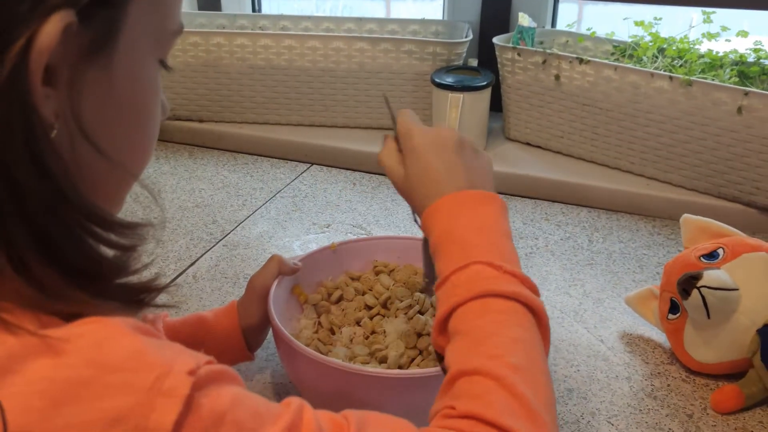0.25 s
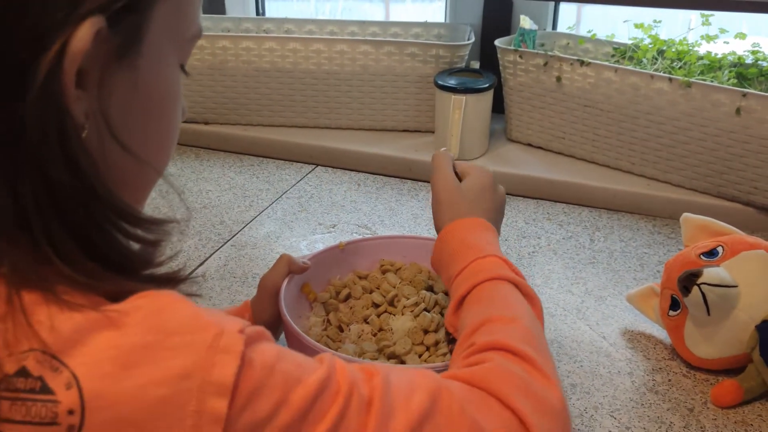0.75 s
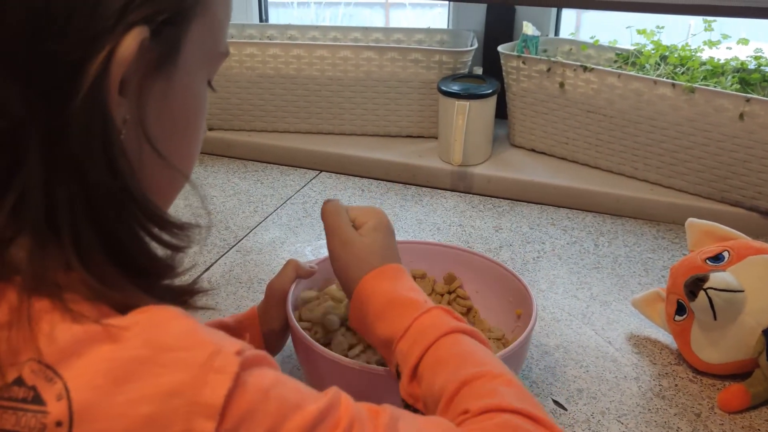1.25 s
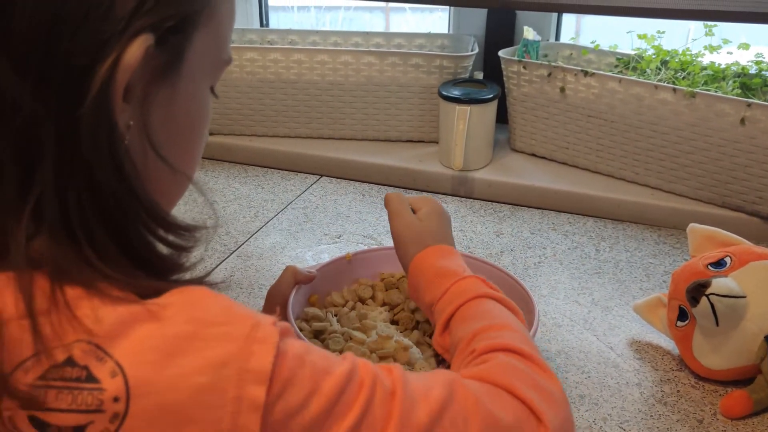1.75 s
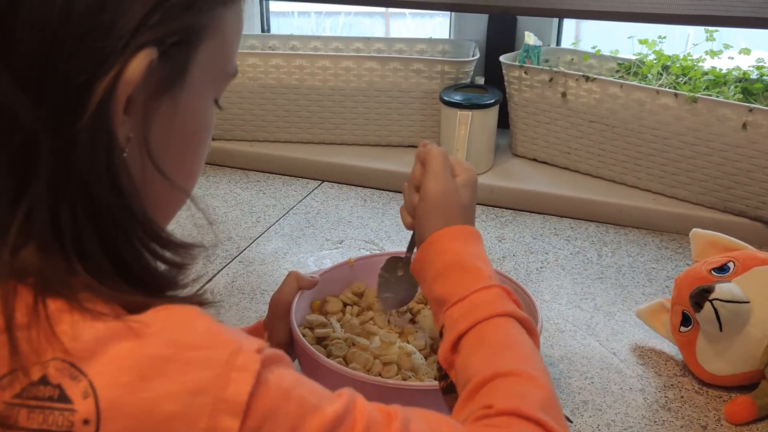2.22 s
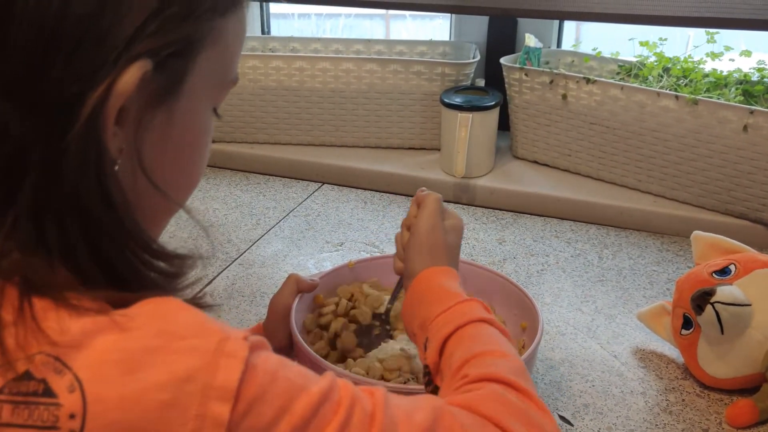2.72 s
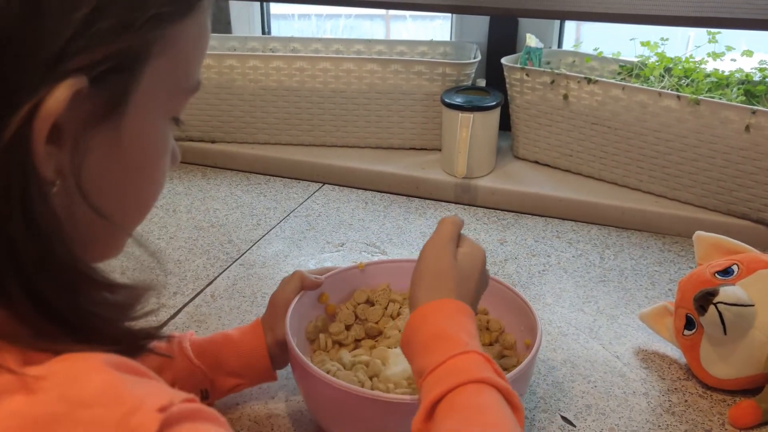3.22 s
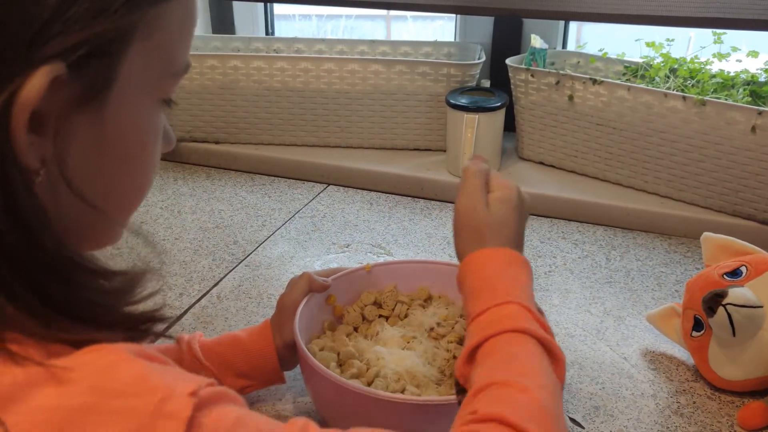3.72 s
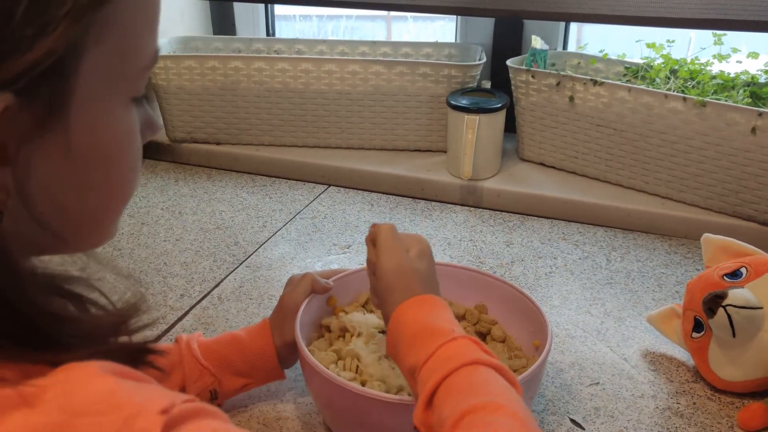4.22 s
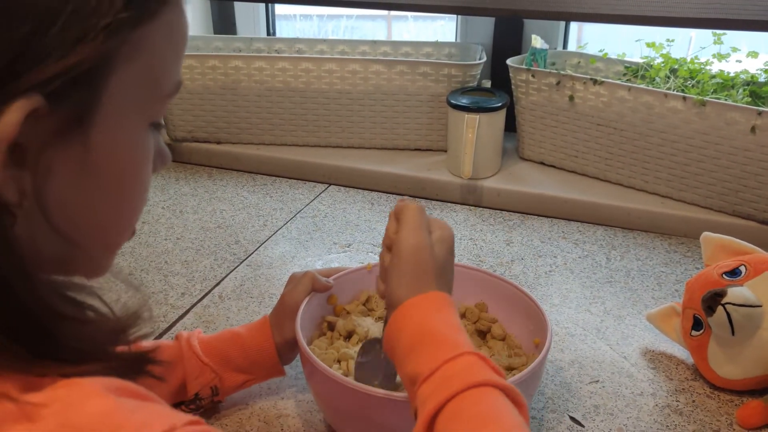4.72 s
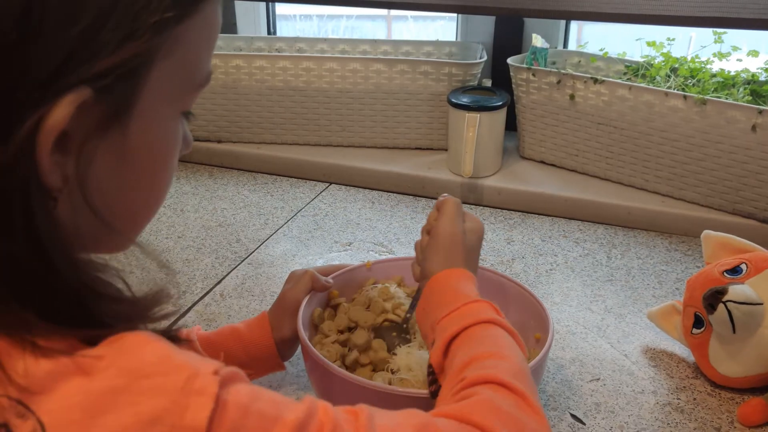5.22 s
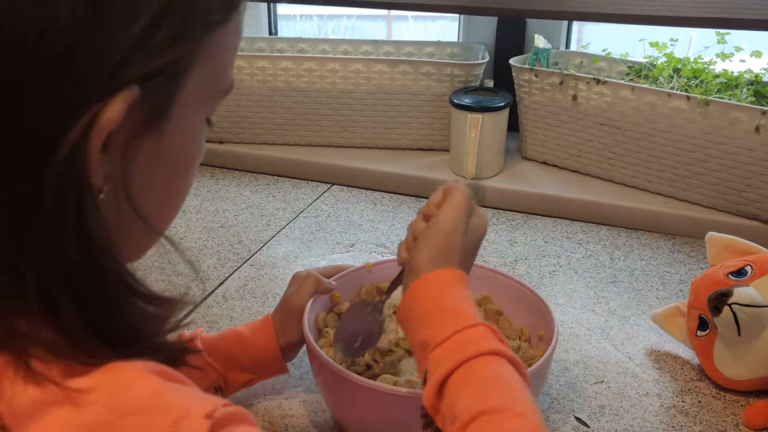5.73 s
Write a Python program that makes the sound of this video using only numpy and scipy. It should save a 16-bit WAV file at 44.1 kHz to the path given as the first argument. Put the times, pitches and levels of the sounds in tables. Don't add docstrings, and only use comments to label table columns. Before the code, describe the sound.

A spoon stirs dry crunchy cubes in a plastic bowl on a kitchen table. Faint crumbly jabs come first, then dense clattering and rustling, a dull bowl knock, and longer drags that thin out. After a short lull come a sharp jab, sparser strokes and faint metallic ticks, then a hard bright knock at the end. Close stereo microphone, small room, quiet low fridge hum.

```python
import sys
import numpy as np
from scipy import signal
from scipy.fft import rfft, irfft, next_fast_len
from scipy.io import wavfile

SR = 44100
rng = np.random.default_rng(int(sys.argv[2]) if len(sys.argv) > 2 else 0)


def bounce(signal):
    frames = np.transpose(np.atleast_2d(signal))
    limited = np.clip(frames, -1, 1)
    pcm = np.round(limited * 32767).astype(np.int16)
    wavfile.write(sys.argv[1], SR, pcm)


def magnitude_from_level(level_db):
    exponent = np.asarray(level_db, float) / 20
    return 10 ** exponent


N = 262904


def rms_one(x):
    return x / np.sqrt(np.mean(x ** 2) + 1e-20)


def at_hz(points, hz):
    curve_hz, value = np.array(points)[:, 0], np.array(points)[:, 1]
    return np.interp(np.log(hz), np.log(np.maximum(curve_hz, 1)), value)


def butter(x, order, hz, kind):
    return signal.sosfilt(signal.butter(order, hz, kind, fs=SR, output="sos"), x)


def drift(rate_hz):
    r = np.exp(-80 * np.pi * rate_hz / SR)
    noise = rng.standard_normal(N // 40 + 2002)
    slow = signal.lfilter([1], [1, -2 * r, r * r], noise)[2000:]
    return np.interp(np.arange(N) / 40, np.arange(len(slow)), rms_one(slow))


def resonance(x, hz, width_hz):
    r = np.exp(-np.pi * width_hz / SR)
    poles = [1, -2 * r * np.cos(2 * np.pi * hz / SR), r * r]
    return signal.lfilter((1 - r * r) / 2 * np.array([1, 0, -1]), poles, x)


def stereo(mid, side, alike, lean_db=0):
    alike = np.clip(alike, -1, 1)
    opposed = np.sqrt(1 - alike) * side * np.array([[1], [-1]])
    pair = np.sqrt(1 + alike) * mid + opposed
    return pair * magnitude_from_level([[lean_db / 2], [-lean_db / 2]]) / np.sqrt(2)


def struck(at_s, blows, modes):
    out, at = np.zeros(N), (np.array(at_s) * SR).astype(int)
    strength_db = rng.normal(0, 1.5, (len(at), len(modes)))
    for k, (hz, level_db, t60_s) in enumerate(modes):
        clicks = np.full(N, 1e-18)
        clicks[at] = blows[:, k] * magnitude_from_level(level_db + strength_db[:, k])
        r, w = magnitude_from_level(-60 / (t60_s * SR)), 2 * np.pi * hz / SR
        out += signal.lfilter([0, np.sin(w)], [1, -2 * r * np.cos(w), r * r], clicks)
    return out


# hz, level_db (per Hz)
CONTACT_COLOUR = [(290, -57), (500, -28), (707, -18), (878, -24.5), (1210, -18.5), (1350, -23.5),
                  (2060, -2), (2520, 2), (3890, -10), (4760, -6), (7900, -15.5), (10400, -37.5),
                  (12000, -21.5), (14100, -20.5), (15800, -26)]
PART_EDGES_HZ = [1600, 3700, 7400]
# wall_db, cubes_db, crusts_db, crumbs_db
PART_TRIM_DB = [-4, -1, -2.5, 2]
# hz, part_number
PART_BLEND = [(1300, 0), (1900, 1), (3200, 1), (4300, 2), (7000, 2), (9000, 3)]
# hz, likeness (0..1)
TABLE_LIKENESS = [(60, 0.56), (130, 0.94), (290, 0.55), (640, 0.017), (1410, 0.11), (3100, 0.44),
                  (6820, 0.023), (15000, 0.045)]
# hz, lean_db
TABLE_LEAN = [(60, 1.5), (130, 1.0), (290, -19), (640, -2), (1410, 4.5), (3100, -1.5), (6820, 1.5),
              (15000, -7)]


def bread():
    (at, size), (tap_at, tap_size) = stirred_contacts(), tap_contacts()
    at, size = np.concatenate([at, tap_at]), np.concatenate([size, tap_size], axis=1)
    edges_hz = 480 * 2 ** np.arange(0, 5.1, .18)
    centre_hz = np.sqrt(edges_hz[1:] * edges_hz[:-1])
    part, gain = np.searchsorted(PART_EDGES_HZ, centre_hz), magnitude_from_level(at_hz(CONTACT_COLOUR, centre_hz))
    power = np.bincount(part, gain ** 2 * np.diff(edges_hz) * 2 / SR)
    log_size = np.log(size * (magnitude_from_level(PART_TRIM_DB) / np.sqrt(power))[:, None] + 1e-12)
    taps = slice(-len(tap_at), None)
    out = np.zeros((2, N))
    for k, hz in enumerate(centre_hz):
        blend = np.maximum(1 - np.abs(at_hz(PART_BLEND, hz) - np.arange(4)), 0)
        colour = np.random.default_rng(rng.integers(2 ** 30)).standard_normal((2, len(at)))
        colour *= magnitude_from_level(np.minimum(rng.normal(0, 3.25, len(at)), 6) - 2.0)
        colour[:, taps] = np.sign(colour[:, taps]) * np.abs(colour[:, taps]) ** 0.12
        colour[1, taps] *= .5
        force = np.exp(blend @ log_size)
        mid, side = [np.bincount(at, force * c, N) + 1e-18 for c in colour]
        pair = stereo(mid, side, at_hz(TABLE_LIKENESS, hz), at_hz(TABLE_LEAN, hz))
        out += butter(pair, 2, edges_hz[k:k + 2], "band") * gain[k]
    return out


CONTACTS_PER_S, CLUMP_DB, FLURRY_DB = 3000, 2.5, 2.5
# wall_db, cubes_db, crusts_db, crumbs_db
PART_UNEVEN_DB = [3.7, 1.2, 1.5, 0.23]


def stirred_contacts():
    rate_per_s = CONTACTS_PER_S * magnitude_from_level(CLUMP_DB * drift(25) + FLURRY_DB * drift(90))
    at = np.flatnonzero(rng.random(N) < rate_per_s / SR)
    size = magnitude_from_level(np.outer(PART_UNEVEN_DB, np.minimum(rng.exponential(1, N), 4)[at]))
    size = size * np.sqrt(N / np.sum(size ** 2, axis=1, keepdims=True))
    return at, size * stroke_levels(at / SR)


SWING_DB, FADE_BEND = 20, 1.4
JAB_SWELL_S, JAB_WALL_DB, DRAG_WALL_DB = .005, -14.5, -16.5
DRAG_CRUSTS_DB, CRUSTS_FOLLOW = 5, 0.6
# start_s, cubes_db, fade_s, crusts_db (re cubes), crumbs_db (re cubes)
JABS = [(.002, -85, 0.077, 7, 4), (.34, -86.5, 0.12, 12, 11), (0.174, -75.5, 0.14, 15, 11),
        (0.501, -79, 0.083, 17, 14.5), (0.682, -63, 0.11, 12.5, 0), (0.901, -46.5, 0.22, 1, -5.5),
        (1.108, -52.5, 1, 0, -5.5), (1.289, -39, 0.096, -7, -12), (1.683, -46.5, 0.035, -8, -32),
        (1.723, -45.5, 0.085, -3, -23), (2.013, -54.5, 0.079, -1, -20), (2.186, -65, 0.051, 4, -1),
        (2.278, -68, 0.093, -0.5, 4), (2.433, -64.5, 0.22, 15.5, 8.5), (2.922, -45, 0.092, -1, -19),
        (3.452, -53, 0.31, -1.5, -31), (3.92, -41.5, 0.11, 1, -10.5), (4.85, -48.5, 0.14, -3.5, -8.5),
        (5.927, -55, 0.15, -6, -13)]
# peak_s, cubes_db, swell_s, fade_s, crumbs_db (re cubes)
DRAGS = [(.215, -73.5, 0.045, 0.078, 6.5), (0.842, -44.5, 0.052, 0.15, -6),
         (1.358, -42, 0.041, 0.18, -10.5), (1.55, -62, 0.36, 0.18, 4.5), (1.768, -40, 0.061, .15, -11),
         (1.87, -53, 0.36, 0.25, -8), (2.12, -67, .2, 0.3, -9), (2.473, -42, .03, 0.094, -13.5),
         (2.604, -47.5, 0.12, 0.47, -8.5), (2.88, -56.5, 0.21, 0.61, -0.5), (3.27, -46, 0.37, 0.14, -16.5),
         (3.52, -48.5, 0.093, 0.12, -21), (3.62, -61.5, 0.5, 0.052, -2), (3.7, -62.5, 0.1, 0.049, -12),
         (4.229, -58.5, 0.31, 0.26, -7.5), (4.285, -48, 0.082, 0.052, -9.5), (4.413, -48, 0.15, 0.13, -12),
         (4.58, -67.5, 0.29, 0.12, -7), (4.932, -57.5, 0.043, 0.053, -0.5), (5.168, -51, 0.052, 0.2, -6.5),
         (5.12, -64.5, 0.28, .1, -6), (5.42, -58, 0.21, 0.2, -34), (5.495, -49.5, 0.16, 0.1, -13),
         (5.62, -81.5, 0.16, 0.17, 10.5)]
# peak_s, level_db, swell_and_fade_s
SCRAPES = [
    (.9, -60.5, 0.47),
    (1.3, -61, 0.28),
    (2.66, -57, 0.31),
    (3.27, -52, 0.13),
    (4.28, -59.5, 0.2),
    (4.42, -55, 0.086),
    (5.18, -62, 0.15),
    (5.42, -64, 0.48),
]


def stroke_levels(t):
    jabs = [(s, db, JAB_SWELL_S, fade, JAB_WALL_DB, crusts, crumbs) for s, db, fade, crusts, crumbs in JABS]
    drags = [(s, db, swell, fade, DRAG_WALL_DB, DRAG_CRUSTS_DB + CRUSTS_FOLLOW * crumbs, crumbs)
             for s, db, swell, fade, crumbs in DRAGS]
    s, db, swell, fade, wall, crusts, crumbs = np.transpose(jabs + drags)[:, :, None]
    rise, fall = (s - t) / swell, (np.maximum(t - s, 0) / fade) ** FADE_BEND
    below_db = SWING_DB * np.maximum(rise, fall)
    power = [np.sum(magnitude_from_level(db + part - below_db) ** 2, axis=0) for part in (wall, 0, crusts, crumbs)]
    s, db, length = np.transpose(SCRAPES)[:, :, None]
    power[0] = power[0] + np.sum(magnitude_from_level(db - SWING_DB * np.abs((t - s) / length)) ** 2, axis=0)
    return np.sqrt(power)


BOUNCE_S, BOUNCE_DB = .003, -8
# wall_db, cubes_db, crusts_db, crumbs_db
TAP_TRIM_DB = [-19, -3.5, -2.5, -5]
# start_s, cubes_db (energy), crusts_db (re cubes), crumbs_db (re cubes), pitch_hz
CUBE_TAPS = [(0.1713, -67, 23, 6, 3600), (0.1772, -58, 13, 11, 3620), (0.2065, -54, 20, 5, 1850),
             (0.5012, -55.5, 17, 10, 2210), (0.5126, -56.5, 26, 23, 3570), (0.5171, -66, 23, 32, 3590),
             (0.684, -31, -4, -16, 2700), (0.6951, -34, 16, -3, 3500), (0.7511, -48, 21.5, -10, 3590),
             (0.76, -49, 17, -10, 3600), (0.7924, -46.5, 23, 1, 2750), (0.8171, -33, 9, -13, 2590),
             (0.8452, -16, -10, -8, 2110), (0.8573, -31, 16, 2, 2100), (0.8777, -34, 4, -5, 2650),
             (0.9026, -20.5, 2, -12, 2190), (0.931, -21, 5.5, -6, 2270), (0.952, -41, 1, -7, 2750),
             (1.0044, -38, 8, 8, 2700), (1.0124, -22, -4, -7, 2300), (1.0516, -27.5, 4, -19, 2310),
             (1.074, -28, -1, -13, 2710), (1.1094, -19, 8, -7, 2370), (1.1228, -21.5, -2, -20, 2200),
             (1.1337, -20.5, -0.5, -12, 2640), (1.187, -31, 0, -15, 2180), (1.1949, -25, 6, -8, 2280),
             (1.2291, -29, -14, -16, 2400), (1.2609, -32, -2, -12, 2750), (1.2895, -13.5, -8, -22, 2535),
             (1.2954, -21, -9, -15, 2650), (1.308, -22, -13, -18, 2470), (1.3135, -17.5, -2, -20, 2440),
             (1.3187, -23, -7, -17, 2600), (1.3518, -29, -2, -13, 2700), (1.3579, -17.5, -3, -5, 2400),
             (1.3645, -16, -7, -20, 2580), (1.369, -12.5, -5, -16, 2220), (1.3759, -21, 10, -16, 2570),
             (1.3978, -17, -10, -4, 2900), (1.4123, -19.5, 1.5, -23, 2350), (1.4167, -22, -7, -19, 2570),
               (1.4355, -38, 7, -3, 2750), (1.4647, -23.5, 2, 6, 2470), (1.4754, -22, -14, -19, 2320),
               (1.558, -48, 16, 2, 2010), (1.5643, -41, 14, -5, 1970), (1.6046, -46, 23, 5, 2570),
               (1.6121, -49, 17, -1, 2550), (1.6808, -18, 5, -18, 2660), (1.688, -30, -3, -31.5, 2830),
               (1.726, -25.5, 4, -13, 3640), (1.7427, -20, -14, -22, 2530), (1.7484, -22, 1, -8, 2070),
               (1.7575, -27.5, 13.5, -11, 2120), (1.7655, -13, -6, -27, 2040), (1.7761, -19, -6, -19, 2050),
               (1.7885, -27, 10, -14, 2000), (1.7956, -13, 7, -28.5, 2100), (1.8008, -19, 1, -21, 2390),
               (1.8117, -22, 3, -4, 2420), (1.8575, -32.5, 20, 12, 2730), (1.872, -32, 15, 9, 2010),
               (1.8808, -28.5, 14, 12, 2530), (1.9266, -42, 12, -15, 2160), (1.979, -39, 14, -9, 2300),
               (2.0214, -28.5, -9, -27, 2440), (2.0255, -36, -6, -10, 2860), (2.094, -40.5, 9, -16, 2820),
               (2.185, -31, 0, -21, 2810), (2.1941, -34.5, -1, 2, 3230), (2.2881, -43, 0, -6, 2630),
               (2.369, -58.5, 24, 3, 2330), (2.426, -58, 30, 9, 3120), (2.4421, -42, 23.5, 0, 2480),
               (2.4677, -20.5, 2.5, -9, 2300), (2.5035, -20.5, -9, -17, 2940), (2.5555, -34, 0, -13, 2430),
             (2.5942, -28, -10, -10, 2250), (2.6268, -26, -7, -14, 2250), (2.654, -34, 12, -1, 2050),
              (2.6734, -34, 15.5, 1, 2730), (2.7205, -33, 1, -7, 2630), (2.7424, -22.5, -9, -15, 2410),
              (2.7695, -33, 3, -14, 2410), (2.7765, -40, 3, -7, 2340), (2.7892, -34, 8, -10, 2740),
              (2.8056, -31, 5, -11, 2430), (2.8298, -34, 7, -12, 2720), (2.853, -42, 14, 0, 2270),
              (2.8611, -41, 21, -1, 2670), (2.883, -37, 10, -2, 3600), (2.8957, -34, 5, -4, 2000),
              (2.9236, -17, -5, -25, 2650), (2.9532, -30, 1, -6, 1970), (2.96, -30, 8.5, -10, 3040),
              (2.967, -33, 8, -5, 2730), (2.986, -38, 5, -4, 2940), (2.9958, -34, 12, -6, 2590),
              (3.0416, -37, 6, 2, 2400), (3.0936, -23.5, 4, -6, 2680), (3.118, -32, 6, -13, 2800),
              (3.141, -38, 8.5, -17, 2660), (3.168, -39, 13, -5, 2590), (3.1806, -21.5, 4, -22, 3660),
              (3.245, -32, 16, -14, 2960), (3.251, -27, 10, -19, 2350), (3.32, -29, 7, -22, 2410),
              (3.3598, -28, -9, -23, 2920), (3.422, -36, -1, -39, 2700), (3.4778, -24, -5, -23, 2290),
              (3.503, -21.5, 4, -28, 2410), (3.523, -27, -10, -29, 2170), (3.5276, -28, -9, -18, 2520),
              (3.5554, -28, -8, -23, 2430), (3.5931, -26.5, 2, -16, 2390), (3.6892, -34, 4, -23, 2300),
             (3.9098, -38, 12, 0, 1970), (3.916, -25, 6, -15, 3500), (3.9234, -13.5, 3.5, -18, 2570),
               (3.9319, -19, 6, -19, 2110), (3.9373, -16.5, 5, -14, 2060), (3.9502, -23, 4, -13, 2310),
               (3.9713, -37, 0, -16, 2190), (4.0473, -40, 10, -15, 3200), (4.1101, -54, 15, -1, 2310),
               (4.118, -41.5, 12, -12, 2380), (4.1402, -44.5, 11, -15, 2190), (4.2068, -38, -1, -26, 2630),
               (4.2134, -35, -13, -17, 2590), (4.267, -30, 4, 1, 2140), (4.2845, -25, 1, -21, 2120),
               (4.2981, -33, 1, -16, 2330), (4.3842, -29.5, -6, -14, 2080), (4.4076, -25, -1, -14, 1930),
               (4.426, -31.5, 10, -11, 2730), (4.5563, -33.5, -1.5, -24, 2640), (4.6667, -55, 12, -1, 3040),
               (4.6933, -47, 5, -11, 2120), (4.8562, -28, -8, -17, 2005), (4.8755, -39, 14, 12, 2100),
               (5.1604, -42, 9, -1, 2550), (5.1673, -26, -0.5, -17, 2510), (5.172, -20.5, -7, -18, 2240),
               (5.1793, -30, 7, -7, 2170), (5.2247, -27.5, -1, -17, 1990), (5.2307, -27, -10, -16, 2070),
               (5.402, -36, -14, -24, 2590), (5.4595, -25, 3, -7, 2300), (5.4854, -29, -1, -21, 2620),
               (5.4997, -29, -9, -20, 2520), (5.5083, -32, -12, -25, 2450), (5.566, -41, 12, -4, 3140),
               (5.599, -56, 25, 9, 2890), (5.608, -53.5, 25, 19, 2840), (5.9324, -21, -9, -15, 2920),
             (5.658, -54.5, 9, 0, 2000),
    (5.675, -51, 8, 4, 2710),
    (5.9306, -29, -4, -20, 2400),
    (5.9543, -11, 7, 5, 1100),
    (3.9, -41, -6, -20, 3600),
    (2.618, -50, 8, 15, 2400),
]
TAPS = CUBE_TAPS


def tap_contacts(count=3):
    s, cubes, crusts, crumbs, _ = np.transpose(TAPS)[:, :, None]
    late = rng.exponential(1, (len(TAPS), count)) * (np.arange(count) > 0)
    fade_db = (BOUNCE_DB - late) * (late > 0)
    at = np.minimum((s + late * BOUNCE_S) * SR, N - 1).astype(int)
    levels_db = [cubes + part + trim + fade_db for part, trim in zip((0, 0, crusts, crumbs), TAP_TRIM_DB)]
    return at.ravel(), magnitude_from_level(levels_db).reshape(4, -1)


RING_ATTACK_S, RING_DB, RING_T60_S = 0.00047, -18.5, 0.028


def cube_rings():
    out, t = np.zeros((2, N + 2000)), np.arange(2000) / SR
    lean_db = rng.normal(0.84, 3.0, len(TAPS))
    for (start_s, cubes_db, _, _, pitch_hz), lean in zip(TAPS, lean_db):
        shape = np.minimum(t / RING_ATTACK_S, 1) * magnitude_from_level(cubes_db + RING_DB - 60 * t / RING_T60_S)
        ring = shape * np.sin(2 * np.pi * pitch_hz * t)
        at = int(start_s * SR)
        out[:, at:at + 2000] += ring * magnitude_from_level([[lean], [-lean]])
    return out[:, :N]


# start_s, blow_db, stem_db (re blow)
TICKS = [
    (.513, -54, -40),
    (4.876, -62, -40),
    (4.91, -63, -40),
    (5.632, -78, 8),
    (5.677, -73, 4),
]
# hz, level_db, t60_s
SPOON_MODES = [(6860, 7.5, 0.065), (13300, 10.5, .045), (13750, -21, .04), (14900, 2, .025)]


def spoon():
    start_s, blow_db, stem_db = np.transpose(TICKS)
    stem = np.arange(len(SPOON_MODES)) == 0
    blows = magnitude_from_level(blow_db[:, None] + np.outer(stem_db, stem))
    return struck(start_s, blows, SPOON_MODES) * magnitude_from_level([[-3.0], [3.0]])


# start_s, blow_db, bright_hz
KNOCKS = [
    (1.681, -48, 1500),
    (3.924, -59, 2015),
    (5.954, -23.5, 8700),
    (5.9558, -19, 800),
]
# hz, level_db, t60_s
BOWL_MODES = [(446, -32, 0.037), (700, -9.5, 0.068), (820, -17.5, 0.08), (1154, -19, 0.034),
              (5780, -15, 0.0096), (2060, 6.5, 0.015), (2940, 4.5, 0.035), (5100, 0.5, 0.053)]


def bowl():
    start_s, blow_db, bright_hz = np.transpose(KNOCKS)[:, :, None]
    blows = magnitude_from_level(blow_db) / (1 + (np.array(BOWL_MODES)[:, 0] / bright_hz) ** 2)
    left = magnitude_from_level(0.5) * struck(start_s[:, 0], blows, BOWL_MODES)
    right = struck(start_s[:, 0] + 0.00012, blows, BOWL_MODES)
    return butter([left, right], 2, 350, "high")


CRACK_T60_S, CRACK_LOW_HZ = 0.0088, 440
# start_s, peak_db
CRACKS = [
    (1.6806, -40),
    (5.9538, -36.5),
]


def cracks():
    out, t = np.zeros((2, N + 400)), np.arange(400) / SR
    bursts = rng.standard_normal((len(CRACKS), 400)) * magnitude_from_level(-60 * t / CRACK_T60_S)
    for (start_s, peak_db), burst in zip(CRACKS, bursts):
        at = int(start_s * SR)
        out[:, at:at + 400] += magnitude_from_level(peak_db) * burst
    return butter(out[:, :N] + 1e-18, 4, CRACK_LOW_HZ, "high")


# start_s, end_s, start_hz, end_hz, level_db
SLIDE = (3.62, 3.9, 5900, 5500, -73)


def slide():
    start_s, end_s, start_hz, end_hz, level_db = SLIDE
    along = np.clip((np.arange(N) / SR - start_s) / (end_s - start_s), 0, 1)
    rough = rms_one(signal.lfilter([1], [1, -.93], rng.standard_normal((2, N))))
    phase = 2 * np.pi * np.cumsum(start_hz + (end_hz - start_hz) * along) / SR
    return magnitude_from_level(level_db) * np.sin(np.pi * along) ** .5 * rough * np.sin(phase)


# start_s, peak_db, pitch_hz
THUMPS = [(1.347, -68, 77), (1.617, -62, 70.3), (1.899, -74, 61.9), (2.551, -65.5, 77.5),
          (2.699, -71, 73.6), (2.949, -68, 62), (3.071, -67, 75), (3.219, -67, 82), (3.578, -70, 99),
          (4.948, -67, 65), (5.298, -73, 99.6)]


def table_top():
    out, t = np.zeros(N), np.arange(N) / SR
    for start_s, peak_db, pitch_hz in THUMPS:
        late = np.maximum(t - start_s, 0) / 0.015
        swell = magnitude_from_level(peak_db + 2.5) * late * np.exp(1 - late)
        out += swell * np.sin(2 * np.pi * pitch_hz * (t - start_s))
    return out * magnitude_from_level([[1.5], [-1.5]])


KITCHEN_T60_S, KITCHEN_DB, WALL_CUT_HZ = 0.081, -8, 23000


def kitchen(x):
    size = next_fast_len(N + SR)
    w = 2 * np.pi * np.arange(size // 2 + 1) / size
    dull = 1 / (1 + (w * SR / (2 * np.pi * WALL_CUT_HZ)) ** 2) ** .5
    lags = rng.uniform(0.0034, .03, (2, 8, 1)) * SR
    loop = magnitude_from_level(-60 * lags / SR / KITCHEN_T60_S) * dull * np.exp(-1j * w * lags)
    echoes = np.sum(loop / (1 - loop), axis=1)
    return irfft(rfft(x, size) * echoes, size)[:, :N]


MOTOR_HZ, MOTOR_DB, MOTOR_WANDER_HZ, MOTOR_FLICKER_DB = 283.9, -69, 1.8, 2.5


def fridge_motor():
    phase = 2 * np.pi * np.cumsum(MOTOR_HZ + MOTOR_WANDER_HZ * drift(7.9)) / SR
    level = magnitude_from_level(MOTOR_DB + MOTOR_FLICKER_DB * drift(14.6)) * np.sqrt(2)
    return level * np.sin(phase + [[.4], [-.4]]) * magnitude_from_level([[.6], [-.6]])


QUIET_DB = -66.5
# hz, level_db (per Hz)
QUIET = [(30, -6), (50, -7), (84, -17.5), (174, 3.5), (235, -23.5), (291, -9.5), (333, -11.5), (769, -16),
         (950, -27.5), (4100, -30), (4820, -34.5), (8050, -36), (12100, -42), (15800, -45)]
# hz, likeness (0..1)
QUIET_LIKENESS = [(25, 0), (60, 0.31), (150, 0.94), (300, 0.99), (600, 0), (2000, 0.26), (12000, 0)]
# hz, width_hz, rms_db
DRONE = [(150.7, 17.6, -68), (193.8, 25.6, -64), (450.6, 62, -79)]


def background():
    out, edges_hz = 0, 22 * 2 ** np.arange(0, 9.6, .5)
    white = rng.standard_normal((2, 2, N))
    for k, (low_hz, high_hz) in enumerate(zip(edges_hz, edges_hz[1:])):
        mid, side = butter(white[k % 2], 2, [low_hz, high_hz], "band")
        hz = np.sqrt(low_hz * high_hz)
        out = out + magnitude_from_level(at_hz(QUIET, hz)) * stereo(mid, side, at_hz(QUIET_LIKENESS, hz))
    out = magnitude_from_level(QUIET_DB) * rms_one(out)
    for hz, width_hz, rms_db in DRONE:
        once = resonance(rng.standard_normal((2, N + SR)), hz, width_hz)
        mid, side = resonance(once, hz, width_hz)[:, SR:]
        out = out + magnitude_from_level(rms_db) * rms_one(stereo(mid, side, at_hz(QUIET_LIKENESS, hz), 1.4))
    return out


def scene():
    table = bread() + cube_rings() + spoon() + bowl() + slide() + cracks()
    return table + magnitude_from_level(KITCHEN_DB) * kitchen(table) + table_top() + background() + fridge_motor()


def low_pass(x):
    return signal.sosfilt(signal.butter(12, 16670, fs=SR, output="sos"), x)


# hz, width_hz, lift_db
PORT = [(4688, 385, 8.5), (2014, 144, 2.5), (11840, 266, 7), (727, 117, 5), (8070, 1830, -11),
        (10450, 430, 0)]
# low_hz, high_hz
PASS_HZ = [42, 15450]


def record(dry):
    for hz, width_hz, lift_db in PORT:
        dry = dry + (magnitude_from_level(lift_db) - 1) * resonance(dry, hz, width_hz)
    dry = butter(dry, 4, PASS_HZ[0], "high")
    mix = signal.sosfilt(signal.cheby1(10, 1, PASS_HZ[1], fs=SR, output="sos"), dry)
    return low_pass(mix)


dry = scene()
out = record(dry)
bounce(out)
```